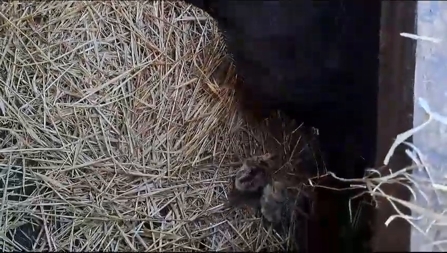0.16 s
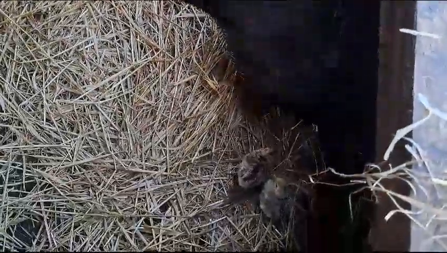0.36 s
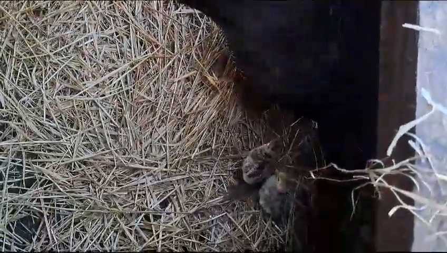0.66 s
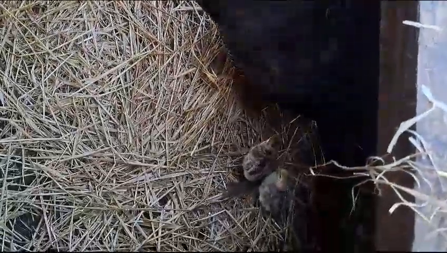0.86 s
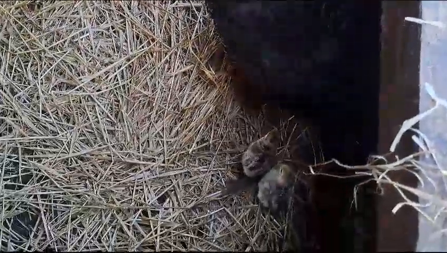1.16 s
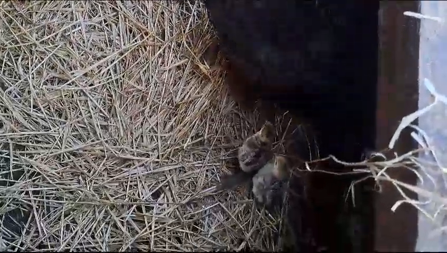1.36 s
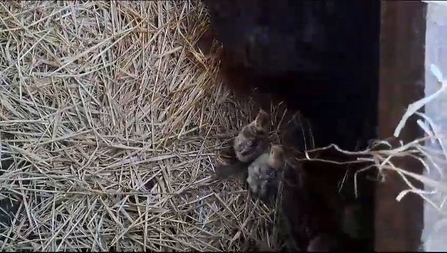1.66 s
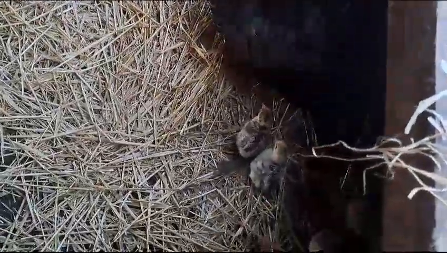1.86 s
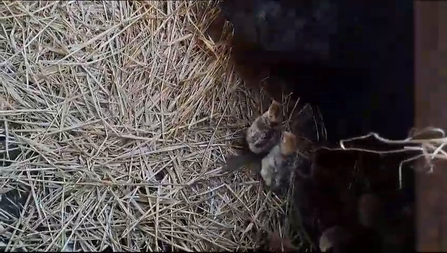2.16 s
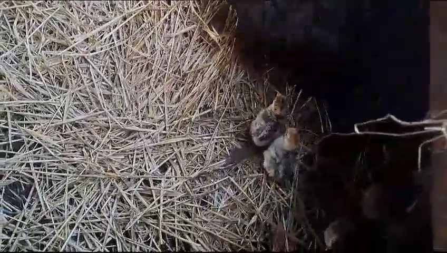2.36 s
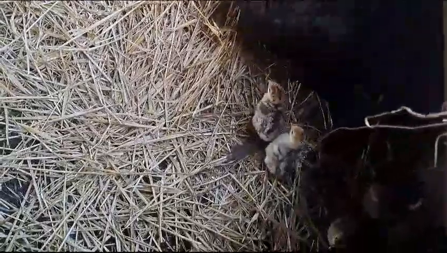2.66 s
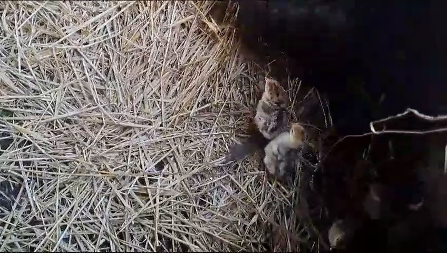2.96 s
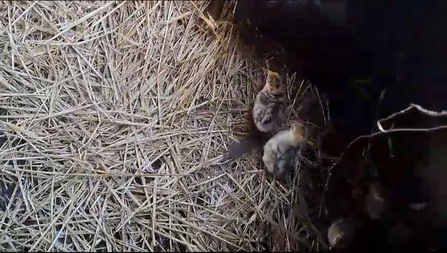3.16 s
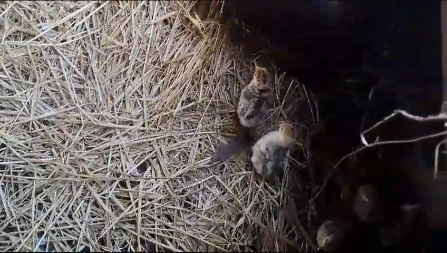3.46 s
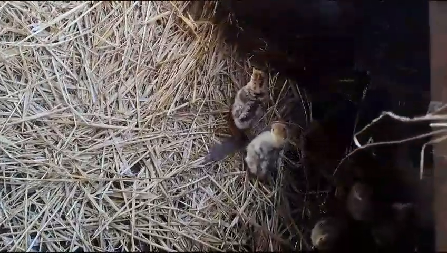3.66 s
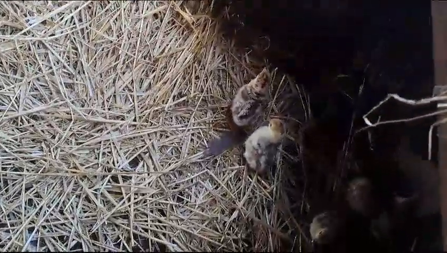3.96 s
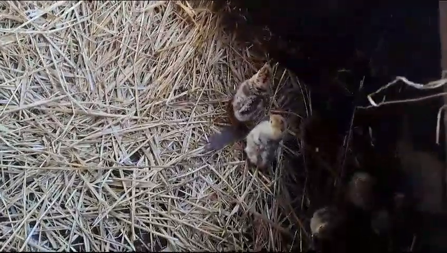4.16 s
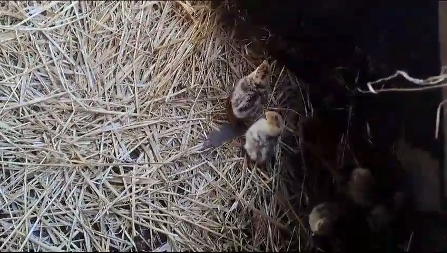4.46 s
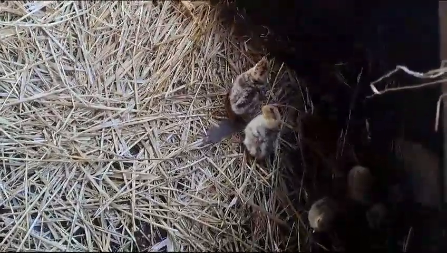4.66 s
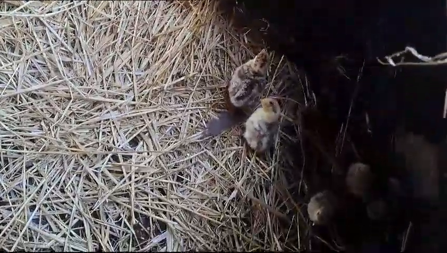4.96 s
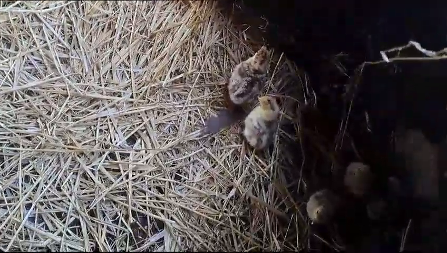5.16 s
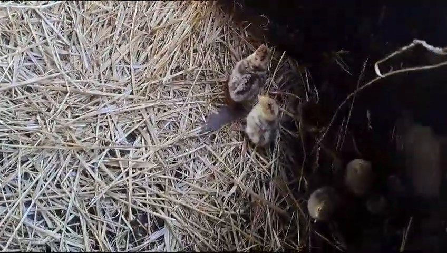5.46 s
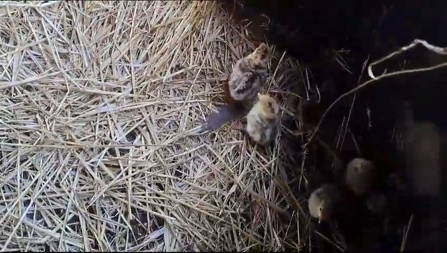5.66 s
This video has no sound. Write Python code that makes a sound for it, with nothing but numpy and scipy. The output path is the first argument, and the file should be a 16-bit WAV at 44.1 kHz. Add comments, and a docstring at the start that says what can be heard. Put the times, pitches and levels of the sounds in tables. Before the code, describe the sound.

A turkey hen calls very near the microphone, with tight, woody, boxed-in echoes. Four popping clucks are spread unevenly among two cracking yelps and one rattling purr. Faint high chick peeps and a brief bird warble sit to the right. Straw rustles and ticks crisply over a low, soft shed hum, and a deep rumble of wind rises at the end.

```python
"""Inside a wooden nest box in a shed, a turkey hen calls close to a two-port microphone.
From the start the shed hums low and hiss swells over rustling straw; a small bird trills on the right from
0.8 s, chicks peep later. Sharp clucks (a pitch shot with a ringing beak) start at 1.3 s, straw ticks (noise
bursts) fall among them, and near 2 s a yelp scoops, breaks and drops. A purr of short gliding beats starts
softly at 2.8 s, then grows loud under a thin wheeze. A second yelp comes at 5.4 s, then a long gust of low
rumble rises under a last cluck."""
import sys
import numpy as np
from scipy import signal
from scipy.fft import rfft, irfft
from scipy.io import wavfile
from scipy.ndimage import uniform_filter1d

SR = 44100
rng = np.random.default_rng(int(sys.argv[2]) if len(sys.argv) > 2 else 0)


def unload_wav(signal):
    """Save mono or channel-first audio to the path in sys.argv[1] as 16-bit WAV at rate SR, clipped to [-1, 1]."""
    wavfile.write(
        sys.argv[1],
        SR,
        np.round(np.clip(np.atleast_2d(signal).T, -1, 1) * 32767).astype(np.int16),
    )


N = 255780  # samples, 5.8 s

# Sharp clucks, close to the microphone; levels before the box answers:
# t/s, level/dB, length/s, start f/Hz, top f/Hz, beak f/Hz, then beak, rasp and puff relative level/dB
CLUCKS = [(1.337, -12.5, 0.016, 458.6, 1250, 3520, -8.5, -18.5, -29),
          (2.937, -8.5, 0.015, 505, 1234, 3573, -2, -22, -25.5),
          (3.453, -11.5, 0.018, 530.5, 1239, 3470, -12.5, -23.5, -25.5),
          (5.755, -10.5, 0.017, 491.7, 1182, 3185, 3.5, -10, -23)]
# Lower resonances of the mouth: share of the beak f, width/Hz, level/dB
MOUTH = [(.42, 170.6, 19.5), (.545, 120, 18.5), (.71, 200, 19)]
# Colour of the throat, for overtones of clucks and notes: f/Hz, level/dB
THROAT = [(1100, -5), (1700, 3), (2300, -6), (3500, -6), (4400, -3), (5400, -14), (6800, -4), (9000, -17)]
RATTLE_HZ, RATTLE_DEPTH = 232.7, 0.55  # a second, slower flap of the membranes breaks up the cluck


def cluck(s, db, length, start_hz, top_hz, beak_hz, beak_db, rasp_db, puff_db):
    """The pitch shoots up in a few cycles; the membranes snap shut and ring the open beak; air puffs out."""
    u = np.linspace(0, 1, round(length * SR))
    hz = start_hz + (top_hz - start_hz) * u ** 1.3
    phase = 2 * np.pi * np.cumsum(hz) / SR
    push, snap = np.sin(np.pi * u ** 1.29), np.sin(np.pi * u ** 1.9)
    over = sum(amp(-20.0 - 1.3 * (k - 5.0) + read(THROAT, k * hz)) * np.cos(k * phase)
               for k in range(2, 12))
    ring_out = np.zeros(2000)  # silence for the resonances to die in
    puffs = np.r_[snap ** 2 * (1.2 + np.cos(phase)) * rng.standard_normal(len(u)), ring_out]
    beak = resonate(resonate(puffs, beak_hz, 170), beak_hz, 600)
    rasp = resonate(resonate(puffs, 5000, 6500), 8200, 4000)
    for share, width_hz, part_db in MOUTH:
        mouth_hz = share * beak_hz
        rasp = rasp + amp(part_db) * resonate(resonate(puffs, mouth_hz, width_hz), mouth_hz, 2 * width_hz)
    puff = resonate(np.r_[snap, ring_out], 73, 90)
    rattle = 1 + RATTLE_DEPTH * np.cos(2 * np.pi * (RATTLE_HZ * length * u + rng.random()))
    voice = np.r_[rattle * (push * np.sin(phase) + push ** 2 * over), ring_out]
    voice = voice + amp(beak_db) * beak / abs(beak).max()
    voice = voice + amp(rasp_db) * rasp
    return s, amp(db) * (voice + amp(puff_db) * puff / abs(puff).max())


# Yelps, a scoop that breaks up into a whistle; levels before the box answers:
# t/s, length/s, break after t/s, top f/Hz, start level/dB, scoop level/dB, whistle level/dB
YELPS = [(1.983, 0.12, 0.02, 1279, -37.5, -45.5, -30.5), (5.411, 0.14, 0.04, 1254, -39.5, -39, -32)]
SCOOP_HZ, SCOOP_TOP_HZ, BREAK_HZ = 428.6, 984, 1116  # scoop start, its shelf, whistle start
SETTLE_S, DIP_DB = 0.019, -9  # the whistle's glide time; the drop in level near the break
CREST, SHUT = .76, .87  # whistle peak and closing, as shares of the length
SHUT_DB, END_DB = -12, -22  # levels at the closing and the end, against the whistle


def yelp(s, length, break_s, top_hz, start_db, scoop_db, db):
    """The pitch scoops up to a shelf, breaks upward and settles; the whistle swells and shuts."""
    t = np.linspace(0, length, num=60)
    # the second and third marks overlap, so the level falls abruptly just before the break
    marks = [0, 0.91 * break_s, 0.83 * break_s, CREST * length, SHUT * length, length]
    levels = [start_db, scoop_db, scoop_db + DIP_DB, db, db + SHUT_DB, db + END_DB]
    level_db = np.interp(t, marks, levels)
    scoop = SCOOP_TOP_HZ - (SCOOP_TOP_HZ - SCOOP_HZ) * np.exp(-3 * t / break_s)
    whistle = top_hz - (top_hz - BREAK_HZ) * np.exp((break_s - t) / SETTLE_S)
    hz = np.where(t < break_s, scoop, whistle)
    return note(np.c_[s + t, hz, level_db], hoarse=.14, waver=.016, half=.06)


# Falling notes, heard after the yelps and once near the start; levels before the box answers:
# t/s, length/s, start f/Hz, end f/Hz, glide/s, crest after t/s, crest level/dB, fade/dB per s, strong-weak 0-1
DROPS = [(0.01, 0.051, 823, 437, 0.034, 0.0037, -33, 25, 0.06),
         (2.12, 0.14, 633, 453.7, 0.0045, 0.0027, -24.5, 278, 0.04),
         (5.547, 0.05, 900, 521, .008, 0.016, -20, 505, 0.18)]
DROP_SWELL_DB = -12  # level at the onset, against the crest


def drop(s, length, start_hz, end_hz, glide_s, crest_s, db, fade_db, half):
    """The pitch sinks and settles; the level swells to a crest and fades."""
    t = np.linspace(0, length, num=40)
    level_db = db + np.where(t < crest_s, DROP_SWELL_DB * (1 - t / crest_s), fade_db * (crest_s - t))
    hz = end_hz + (start_hz - end_hz) * np.exp(-(t / glide_s) ** 2.5)
    return note(np.c_[s + t, hz, level_db], hoarse=.28, waver=.011, half=half)


# Beats of the purr, first soft, then loud; levels before the box answers:
# t/s, length/s, start f/Hz, end f/Hz, peak level/dB, place of the peak 0-1
PURR = [(2.846, 0.29, 561, 557, -54.5, 0.42), (3.165, 0.12, 587, 548, -60, 0.22),
        (3.329, 0.095, 579, 560, -59.5, 0.17), (3.564, 0.035, 504, 354, -30, 0.1),
        (3.647, 0.039, 443, 390, -33.5, 0.13), (3.684, 0.023, 576.4, 500, -23, 0.59),
        (3.708, 0.0097, 540, 480, -24.5, 0.5), (3.725, 0.047, 416, 467, -33.5, 0.3),
        (3.773, 0.069, 451.4, 548, -33, 0.14), (3.837, 0.049, 483, 538, -32, 0.64),
        (3.899, 0.077, 534, 531, -24, 0.3), (3.962, 0.045, 585.7, 526.7, -17, 0.57),
        (4.003, 0.024, 520, 548, -26.5, 0.45), (4.023, 0.027, 583, 566, -15, 0.53),
        (4.049, 0.014, 539, 543, -16, 0.52), (4.064, .014, 531, 558, -33, .4),
        (4.082, 0.032, 534.4, 524, -16, 0.52), (4.156, 0.033, 532, 539, -29, 0.35)]


def beat(s, length, start_hz, end_hz, db, place):
    """One beat of the purr: a rounded swell on a short glide."""
    u = np.linspace(0, 1, 24)
    hz = start_hz + (end_hz - start_hz) * u
    rows = np.c_[s + length * u, hz, db + swell_db(u, place, 1.05)]
    return note(rows, hoarse=.03, waver=.004, half=0)


# A thin wheeze over the loud purr: t/s, length/s, start f/Hz, end f/Hz, level/dB
WHEEZE = (3.73, .41, 2070, 2200, -65)
# Its partials: multiple of f, level/dB
WHEEZE_PARTIALS = [(2, 0), (3, -3), (4, -9), (5, -12)]


def wheeze(start, length, start_hz, end_hz, db):
    """A faint, wavering stack of partials above a pitch that is itself absent."""
    rows = [(start, start_hz, db - 5), (start + length, end_hz, db)]
    s, hz, _, phase, edges = sung(rows, .04, waver=.02)
    stack = sum(amp(part_db) * np.cos(k * phase) for k, part_db in WHEEZE_PARTIALS)
    return s, amp(db) * edges * stack


def note(rows, hoarse, waver, half):
    """Near sine; effort and the beak, which opens for high notes, bring up the overtones and breathy air."""
    s, hz, db, phase, edges = sung(rows, .003, waver)
    shake = evened(uniform_filter1d(rng.standard_normal((len(hz), 17)), 400, 0)).T
    flicker = amp(2.6 * shake)  # each partial flickers alone
    first_db = -36 + .3 * (db + 22.5) + 0.02 * hz
    over = sum(amp(first_db - 3.4 * k + read(THROAT, (k + 2) * hz)) * flicker[k] * np.cos((k + 2) * phase)
               for k in range(16))
    air = resonate(resonate(rng.standard_normal(len(hz)), 4350, 400), 4350, 900)
    breath = amp(first_db - 6.5) * (1 + np.cos(phase)) * air
    voice = np.sqrt(flicker[-1]) * np.cos(phase) + over + breath
    rough = evened(signal.oaconvolve(rng.standard_normal(len(hz)), np.hanning(160), "same"))
    grain = 1 + hoarse * np.linspace(0, 2, len(hz)) * rough  # the note turns hoarse towards its end
    cycles = 1 + half * np.cos(phase / 2)  # strong and weak cycles alternate
    return s, np.sqrt(2) * amp(db) * edges * grain * cycles * voice


def sung(rows, edge_s, waver):
    """Start, pitch, level, phase and soft edges of one note, with a slight waver of pitch."""
    s, hz, db = np.transpose(rows)
    t = np.arange(s[0] - edge_s, s[-1] + edge_s, 1 / SR)
    drift = evened(uniform_filter1d(rng.standard_normal(len(t)), 150))
    hz = uniform_filter1d(np.interp(t, s, hz), 120) * (1 + waver * drift)
    edges = np.clip(np.minimum(t - t[0], t[-1] - t) / edge_s, 0, 1)
    return max(t[0], 0), hz, np.interp(t, s, db), 2 * np.pi * np.cumsum(hz) / SR, edges


def swell_db(u, place, roundness):
    """A rounded rise and fall over u = 0-1 with its peak at place."""
    bent = np.clip(u, 0, 1) ** (np.log(.5) / np.log(np.clip(place, .05, .95)))
    return 20 * np.log10(abs(np.sin(np.pi * bent)) ** roundness + .025)


# Air modes of the box: f/Hz, width/Hz, level/dB
HOLLOW = [(247, 11, -8), (1006, 71, -0.5), (1980, 23, 8)]


def hollow(hen):
    """The air in the box hums after each call."""
    return sum(amp(db) * resonate(hen, hz, width_hz) for hz, width_hz, db in HOLLOW)


# Walls of the box: delay t/ms, left gain, right gain
WALLS = [(3.1, -0.23, 0.27), (4.8, 0.23, -0.13), (7.3, -0.15, 0.4)]
# Decay of the echoes: f/Hz, time to fall 60 dB/s, relative level/dB
BOX = [(300, 0.3, -19), (560, 0.086, -14), (740, 0.12, -3.5), (980, .09, -5), (2830, .06, -3.5),
       (7320, .07, -4)]


def box(walls, tail_db):
    """Single echoes from the walls, then sparse taps of random sign, each band dying at its own speed."""
    taps = np.zeros((2, 12000))
    at = np.arange(300, 11980, 20) + rng.integers(0, 20, (2, 584))
    np.put_along_axis(taps, at, rng.choice([-1., 1.], at.shape), 1)
    hz, t, z = signal.stft(taps, SR, nperseg=512)
    table = np.array(BOX)
    fall_db = read(table[:, ::2], hz)[:, None] - 60 * t / read(table[:, :2], hz)[:, None]
    same = read(SAME, hz)[:, None]  # the bass reaches both ports alike
    z[1] = same * z[0] + np.sqrt(1 - same ** 2) * z[1]
    echo = signal.istft(z * amp(fall_db), SR, nperseg=512)[1]
    echo *= amp(tail_db) / np.linalg.norm(echo[0])
    echo[:, 0] += 1  # the direct sound
    for ms, left, right in walls:
        echo[:, round(ms * SR / 1000)] += left, right
    return echo


# Peeps to the right: chicks, and before 1 s three short ones within the small bird's trill; levels relative:
# t/s, length/s, start f/Hz, middle f/Hz, end f/Hz, peak level/dB, warble as a share of f
PEEPS = [(0.885, 0.014, 3710, 3500, 3800, -52, .01), (0.905, 0.009, 3880, 3600, 3280, -48, 0.011),
         (0.925, 0.02, 3460, 4700, 6000, -54, 0.03), (2.106, 0.026, 6100, 5950, 4600, -49, 0.0061),
         (2.171, 0.029, 3600, 3900, 3200, -51, 0.044), (2.2, 0.038, 4100, 4250, 4060, -52.5, 0.075),
         (2.237, 0.057, 6330, 4850, 4475, -48.5, 0.0045), (2.433, 0.052, 2645, 2620, 2160, -51.5, 0.011),
         (2.56, 0.05, 3420, 3400, 3550, -58.5, 0.019), (2.602, 0.041, 3340, 2720, 2300, -50, 0.023),
         (2.867, 0.031, 6250, 6100, 5820, -50.5, .01), (2.895, 0.036, 4600, 4100, 3610, -53, 0.057),
         (2.997, 0.06, 6250, 4900, 4350, -54, 0.0092), (4.203, 0.08, 3520, 2780, 2450, -68.5, 0.021),
         (5.01, 0.13, 3590, 2530, 2420, -71.5, 0.033), (5.641, 0.13, 3340, 2720, 2430, -68.5, 0.017)]


def peep(start, length, start_hz, middle_hz, end_hz, db, warble_share):
    """A thin whistle on an arc through three pitches, with a flutter in its level."""
    u = np.linspace(0, 1, num=24)
    arc = np.polyval(np.polyfit([0, .5, 1], [start_hz, middle_hz, end_hz], deg=2), u)
    rows = np.c_[start + length * u, arc, db + swell_db(u, .45, .7)]
    s, hz, db, phase, edges = sung(rows, 0.0058, warble_share)
    flutter_db = 5 * evened(uniform_filter1d(rng.standard_normal(len(hz)), 200))
    return s, np.sqrt(2) * amp(db + flutter_db) * edges * np.cos(phase)


# Joined warbles of a small bird, perhaps a wild one outside, to the right; one list each, levels relative:
# t/s, f/Hz, level/dB
WARBLES = [
    [(.827, 3320, -61), (.837, 5240, -50), (.851, 5370, -43), (.863, 4070, -68)],
    [(.949, 3710, -53), (.955, 5520, -41), (.961, 6500, -73), (.965, 5470, -35.5), (.971, 5060, -46),
     (.982, 6050, -44), (.992, 4140, -59), (.999, 3400, -51), (1.006, 4400, -54), (1.012, 3380, -62),
     (1.016, 4700, -54), (1.027, 4900, -52.5), (1.048, 3370, -47.5)],
]


def warble(*rows):
    """A thin whistle that runs up and down without a break."""
    s, _, db, phase, edges = sung(rows, 0.00118, waver=.006)
    return s, np.sqrt(2) * amp(db) * edges * np.cos(phase)


# Straw ticks: t/s, peak level/dB midway between the ports, left minus right level/dB
TICKS = [(1.0827, -38.5, -8), (1.662, -33.5, -6), (3.586, -43.5, 10.5), (3.8884, -35, -22.5),
         (5.065, -53, -4)]


def ticks():
    """Dry stems snap: a burst of about a millisecond."""
    out, t = np.zeros((2, N)), np.arange(150) / SR
    for (s, db, pan_db), burst in zip(TICKS, rng.standard_normal((len(TICKS), 150))):
        snap = resonate(resonate(burst * np.exp(-t / 0.00081), 4400, 4200), 5600, 8600)
        add(out, s, amp(db + np.array([[pan_db], [-pan_db]]) / 2) * snap / abs(snap).max())
    return out


# Swells of hiss and rustling straw, levels relative:
# t/s, length/s, place of the peak 0-1, roundness, peak level/dB, treble level/dB
RUSTLES = [(0, 0.81, 0.55, 0.39, -67.5, -6), (0.77, 0.97, 0.51, 0.27, -57, -10.5),
           (1.231, 0.74, 0.3, 1.88, -44, -1.5), (1.848, 0.92, 0.31, 0.47, -55, 0.5),
           (2.701, 0.53, 0.5, 1.6, -58.5, 2.5), (3.186, 0.5, 0.59, 0.41, -66.5, 4),
           (3.572, 0.059, 0.4, 1.2, -56, -6), (3.636, 0.66, 0.57, 1.73, -59, 2),
           (4.675, 0.25, 0.65, .5, -67.5, 2.5), (5.043, 0.18, 0.05, 0.88, -67, -1)]
# A band of hiss near 1.2 kHz, level relative: t/s, level/dB
MIDDLE = [(0, -45), (1, -52), (2.9, -47.5), (3.15, -61), (3.9, -39), (4.15, -50.5), (4.3, -58), (5.4, -56),
          (5.8, -49.5)]
# Colour of all the hiss: f/Hz, relative density level/dB
RUSTLE_TONE = [(150, -11), (300, -3), (900, -11), (2800, -9), (7000, -13), (8700, -22.5), (11500, -18.5),
               (15500, -25)]
STILL_DB = -76.5  # hiss between the swells, on the same relative scale


def rustle():
    """Swells of broad hiss, each with its own share of treble, over a faint still hiss and a middle band."""
    t = np.arange(N // 128 + 5) * 128 / SR
    hz = np.fft.rfftfreq(512, 1 / SR)[:, None]
    high = read([(7200, 0), (8200, 1)], hz)
    middle = np.exp(-(np.log((hz + 1) / 1200) / .2) ** 2)
    power = amp(STILL_DB) ** 2 + middle * amp(np.interp(t, *np.transpose(MIDDLE))) ** 2
    for s, length, place, roundness, db, treble_db in RUSTLES:
        u = (t - s) / length
        inside = abs(u - .5) < .5
        power = power + inside * amp(db + swell_db(u, place, roundness) + high * treble_db) ** 2
    return amp(-8) * noise(read(RUSTLE_TONE, hz) + 10 * np.log10(power), patchy_db=1.6)


# Gusts that lift the low rumble: t/s, length/s, level/dB
GUSTS = [(1.27, 0.28, -46), (5.598, 1, -38.5)]


def gusts():
    """Swells of rumble, noise mostly below 100 Hz."""
    t, hz = np.arange(N) / SR, np.fft.rfftfreq(N, 1 / SR)
    tone_db = read([(25, -19.0), (60, -1.5), (100, -6.5), (200, -28.0), (400, -53.5)], hz)
    low = irfft(rfft(noise(0, patchy_db=-4)) * amp(tone_db), N)
    swell = np.zeros(N)
    for s, length, db in GUSTS:
        u = (t - s) / length
        swell += (abs(u - .5) < .5) * amp(db + swell_db(u, 0.41, 1.0))
    return evened(low) * swell


# Colour of the shed's hum and air: f/Hz, relative density level/dB
SHED = [(20, -26.5), (50, -2), (65, 4), (95, -13.5), (125, -14.5), (370, -21.5), (600, -26), (1800, -45.5),
        (15500, -56.5)]
SHED_DB = -54  # mean level over both ports


def shed():
    """Low hum and air of the shed; one long filter keeps the hum narrow."""
    hz = np.fft.rfftfreq(N, 1 / SR)
    air = irfft(rfft(noise(0, patchy_db=1.5)) * amp(read(SHED, hz)), N)
    return amp(SHED_DB) * evened(air)


# Likeness of the two ports: f/Hz, left-right likeness
SAME = [(60, .89), (240, .84), (950, 0.058)]


def noise(field_db, patchy_db):
    """Two-port noise under a dB field of (bins, frames), broken into drifting patches."""
    hz = np.fft.rfftfreq(512, 1 / SR)
    a, b, c, d, patches = rng.standard_normal((N // 128 + 5, 257, 5)).T
    patches = evened(uniform_filter1d(uniform_filter1d(patches, 6, 0), 20, 1))
    same, left = np.clip(read(SAME, hz), -1, 1)[:, None], a + 1j * b
    z = np.array([left, same * left + np.sqrt(1 - same ** 2) * (c + 1j * d)])
    lean_db = read(LEAN, hz)[:, None] / 2 * np.array([1, -1])[:, None, None]
    z *= amp(lean_db + field_db + patchy_db * patches)
    return signal.istft(z, nperseg=512, noverlap=384)[1][:, :N]


# The body shades the left port of the microphone: f/Hz, left minus right level/dB at full share
LEAN = [(300, -0.5), (1100, 0), (2600, -15.5), (6000, -4.5), (15000, -0.5)]


def lean(x, share, lead_s):
    """One source at both ports: shaded on the left in the treble, earlier on the left by lead_s."""
    hz = np.fft.rfftfreq(N, 1 / SR)
    half = amp(share * read(LEAN, hz) / 2) * np.exp(1j * np.pi * hz * lead_s)
    return irfft(rfft(x) * np.array([half, 1 / half]), N)


def resonate(x, hz, width_hz):
    """A two-pole resonance of gain 1 at its centre."""
    return signal.lfilter(*signal.iirpeak(hz, hz / width_hz, SR), x)


def amp(db):
    """Gain of a level in dB."""
    return 10 ** (np.asarray(db) / 20)


def evened(x):
    """Scale to an rms of 1."""
    return x / np.sqrt(np.mean(x ** 2) + 1e-20)


def read(points, hz):
    """Read a curve of (Hz, value) points along log frequency."""
    f, value = np.transpose(points)
    return np.interp(np.log(hz + 1), np.log(f + 1), value)


def add(mix, s, sound):
    """Lay a sound into the mix from s seconds, cut at the end."""
    part = mix[..., round(s * SR):][..., :sound.shape[-1]]
    part += sound[..., :part.shape[-1]]


def scene():
    """The hen close by in her box, chicks and a small bird to the right, then straw, shed and gusts behind."""
    hen, small_birds = np.zeros((2, N))
    calls = ((cluck, CLUCKS), (yelp, YELPS), (drop, DROPS), (beat, PURR), (wheeze, [WHEEZE]))
    for call, table in calls:
        for row in table:
            add(hen, *call(*row))
    for row in PEEPS:
        add(small_birds, *peep(*row))
    for rows in WARBLES:
        add(small_birds, *warble(*rows))
    hum = hollow(hen)
    hen = signal.fftconvolve(lean(hen, 0.56, 0.00016), box(WALLS, tail_db=-1.5), axes=1)
    # a negative lead: these reach the right port first
    small_birds = lean(amp(3.0) * small_birds, 0.92, -0.00014)
    small_birds = signal.fftconvolve(small_birds, box([], tail_db=-5.5), axes=1)
    return (hen + small_birds)[:, :N] + hum + ticks() + rustle() + shed() + gusts()


def record(dry):
    """The band limit of the recorder, a steep low-pass at 15.8 kHz."""
    low_pass = signal.firwin(511, 15800, window=("kaiser", 9), fs=SR)
    return signal.oaconvolve(dry, low_pass[None], "same")


dry = scene()
out = record(dry)
unload_wav(out)
```